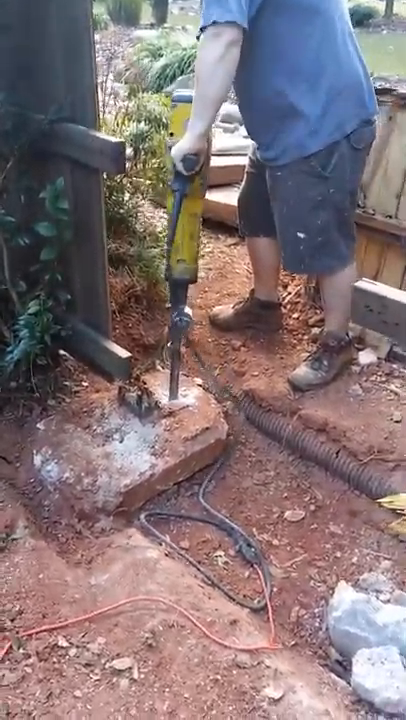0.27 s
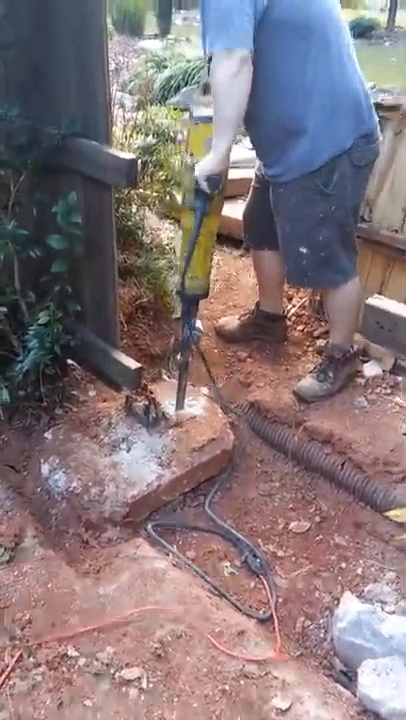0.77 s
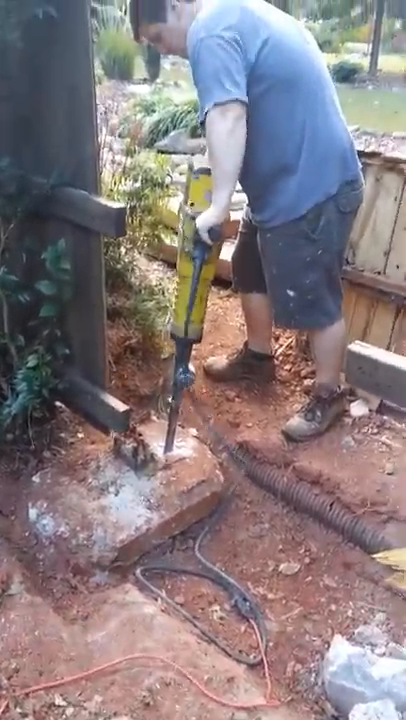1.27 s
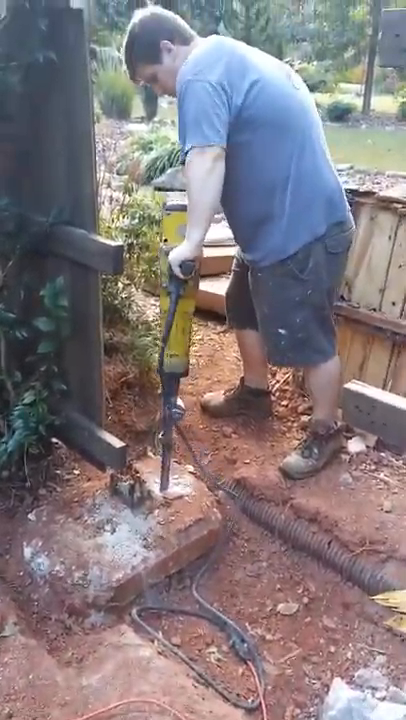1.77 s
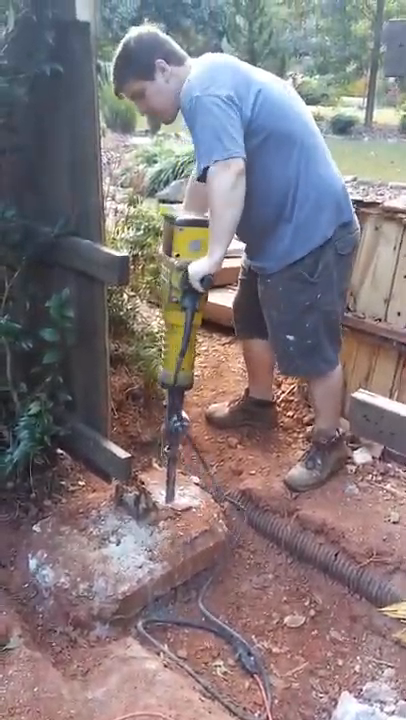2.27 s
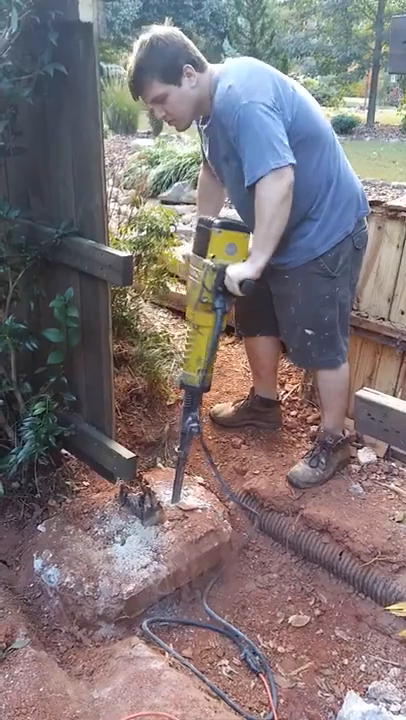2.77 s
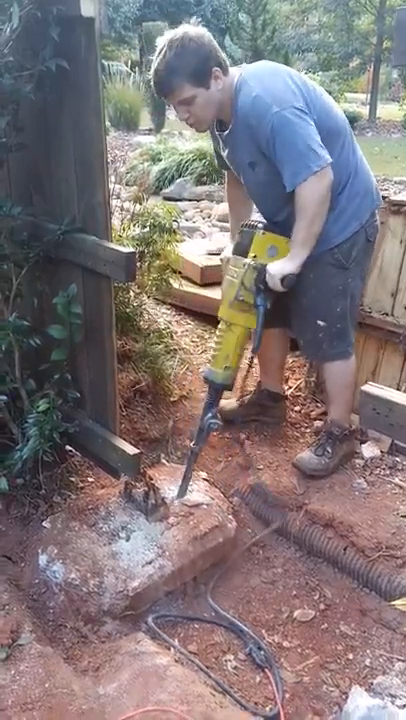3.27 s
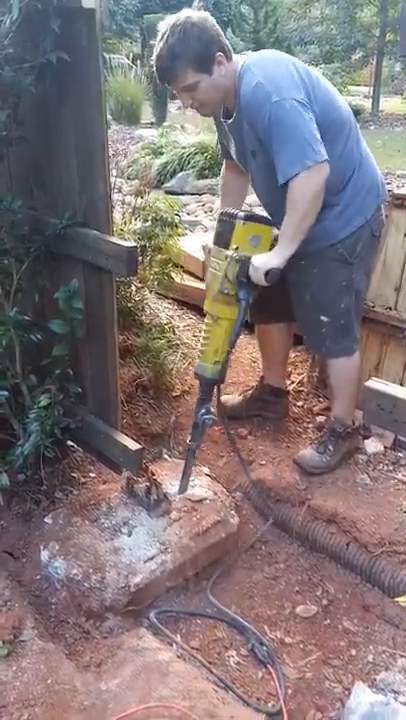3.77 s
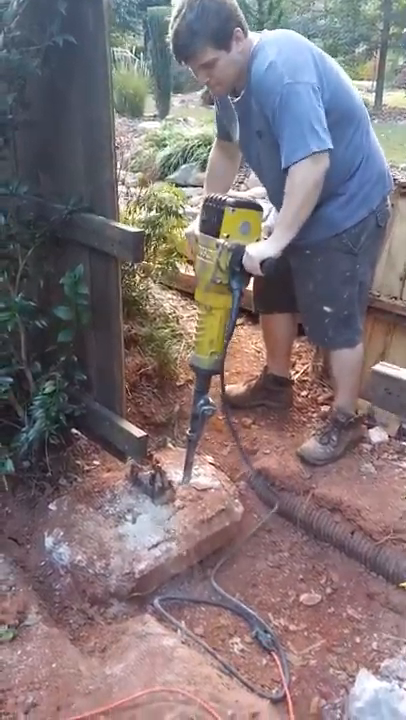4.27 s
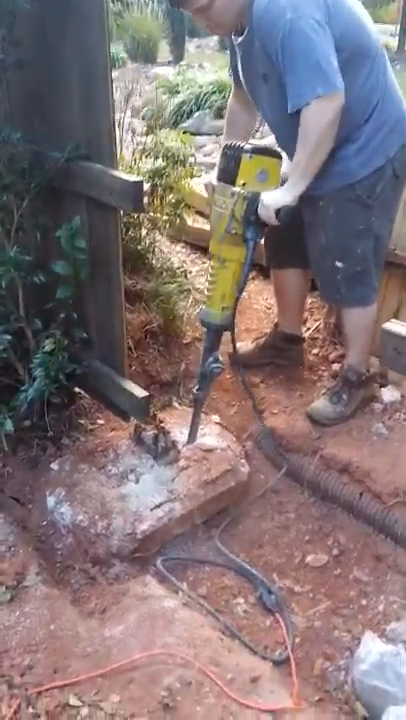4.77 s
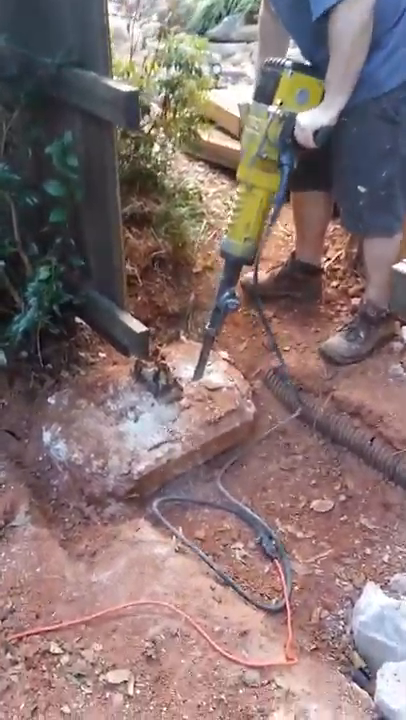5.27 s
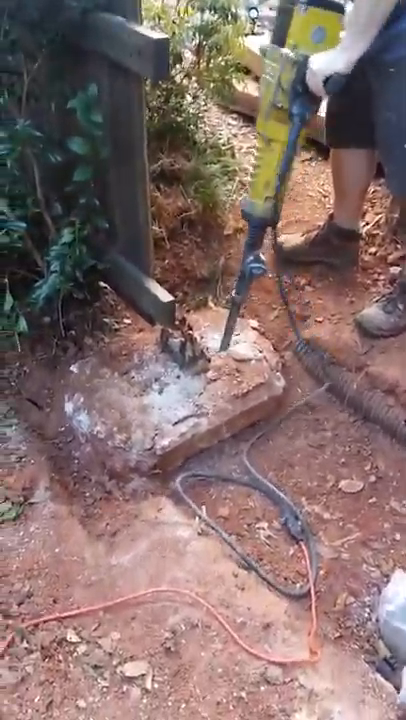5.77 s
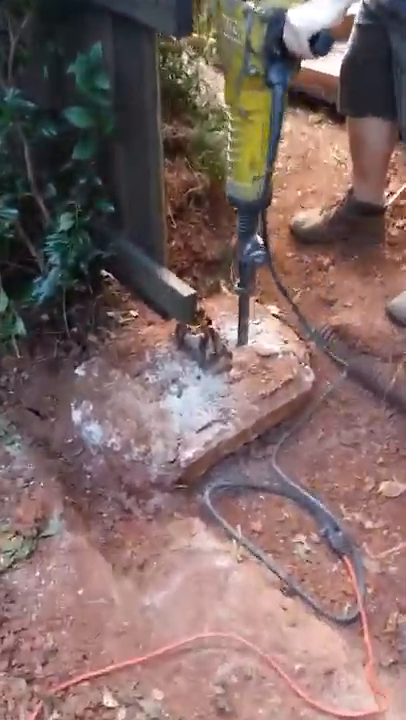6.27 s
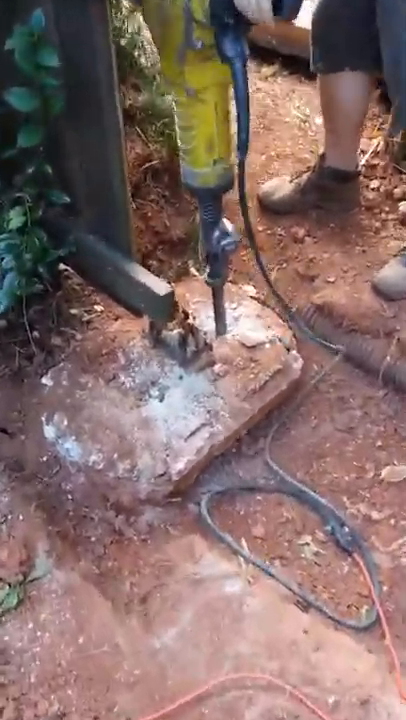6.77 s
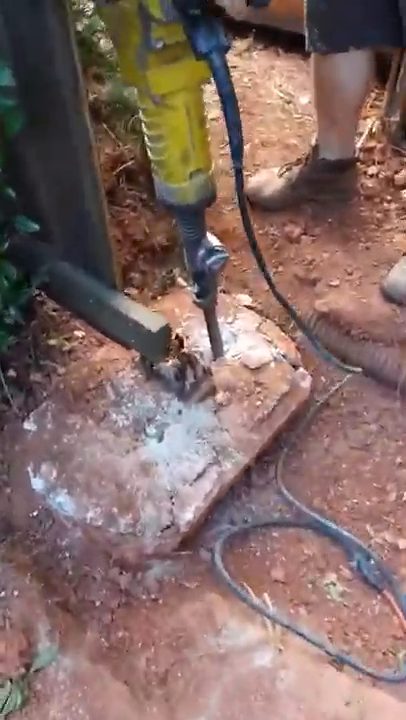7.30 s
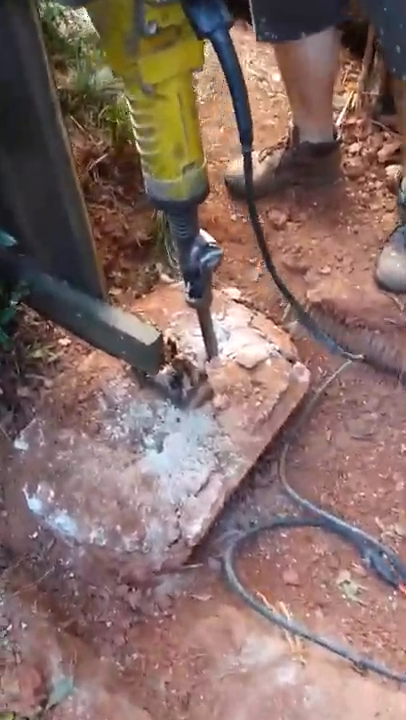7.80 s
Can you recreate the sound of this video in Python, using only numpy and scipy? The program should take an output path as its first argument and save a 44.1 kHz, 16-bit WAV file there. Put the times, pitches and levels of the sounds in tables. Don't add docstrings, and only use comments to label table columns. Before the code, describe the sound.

A dense, squashed, loud stream of steel-on-concrete impacts runs almost the whole time, each blow a sharp crack with a short clangy ring and crackling distortion. A motor roars and whines underneath. At the end the tool coasts: a few widening knocks, chattering gear grind that drops out and returns, tiny clicks, then faint open yard air. Close, dry, mono sound.

```python
import sys
import numpy as np
from scipy import signal
from scipy.fft import rfft, irfft
from scipy.io import wavfile
from scipy.ndimage import uniform_filter1d, minimum_filter1d

SR = 44100
rng = np.random.default_rng(int(sys.argv[2]) if len(sys.argv) > 2 else 0)


def generate_wav(signal):
    frames = np.transpose(np.atleast_2d(signal))
    scaled = np.clip(frames, -1, 1) * 32767
    pcm = np.round(scaled).astype(np.int16)
    wavfile.write(sys.argv[1], SR, pcm)


def boost_factor(decibels):
    exponent = np.asarray(decibels, float) / 20
    return 10 ** exponent


N = 354519


def curve(rows, column=1):
    rows = np.array(rows)
    return np.interp(np.arange(N) / SR, rows[:, 0], rows[:, column])


def colour(x, points):
    f, db = np.transpose(points)
    hz = np.fft.rfftfreq(len(x), 1 / SR)
    gain = boost_factor(np.interp(np.log(hz + 1), np.log(f), db))
    y = irfft(rfft(x) * gain, len(x))
    return y / y.std()


def wobble(width_hz):
    rate_hz = 400
    count = int(N / SR * rate_hz) + 2
    z = rng.standard_normal((count, 2)) @ [1, 1j]
    z = signal.lfilter([1], [1, -np.exp(-np.pi * width_hz / rate_hz)], z)
    return np.interp(np.arange(N) * rate_hz / SR, np.arange(count), z / z.std())


# (time [s], blow number [count])
PACE = [(0.0399, 0), (0.4245, 5), (0.739, 9), (1.5922, 20), (2.308, 29), (2.787, 35), (3.1085, 39),
        (3.3424, 42), (3.958, 50), (4.1912, 53), (4.5083, 57), (5.4495, 69), (5.7565, 73), (6.2895, 80),
        (6.6838, 85), (6.9168, 88)]
SLOWING_S = [7.0061, 7.1158, 7.2526, 7.4472, 7.746]


def strikes():
    s, number = np.transpose(PACE)
    powered = np.interp(np.arange(number[-1] + 1), number, s)
    return np.concatenate([powered, SLOWING_S])


def cycle():
    s = strikes()
    s = np.concatenate([[2 * s[0] - s[1]], s, [s[-1] + 0.35]])
    t = np.arange(N) / SR
    k = np.searchsorted(s, t, "right") - 1
    return np.maximum(k - 1, 0), t - s[k], np.diff(s)[k]


# (time [s], strength [dB], damping [factor])
STRENGTH = [
    (0, -4, 0.84),
    (6.9, 2.5, 1.3),
    (7.0065, -1, 0.82),
    (7.116, 0.5, 0.98),
    (7.252, -4.5, 1.2),
    (7.447, -9.5, 1.54),
    (7.745, -12.5, 4.22),
]


def force():
    now = np.arange(N)
    start = now - np.round(cycle()[1] * SR).astype(int).clip(0, now)
    return boost_factor(curve(STRENGTH))[start], curve(STRENGTH, column=2)[start]


# (frequency [Hz], level [dB])
CRACK = [(60, -37), (150, -7.5), (400, -7.5), (2000, -6.5), (5000, 2.5), (9000, -10), (11500, -6),
         (13200, -12), (14500, 1), (16000, -27)]
# (frequency [Hz], level [dB])
RINGING = [(3000, -33), (5500, -14), (11500, -1), (13200, 9), (15800, -14)]
# (frequency [Hz], level [dB])
HOUSING = [(5500, -24.5), (6800, -9.5), (7600, -3), (8100, 0.5), (8800, -4), (9600, -4.5), (10500, -3.5),
           (11300, -13.5), (14000, -19)]


def blow():
    age = cycle()[1]
    strength, damping = force()
    crack = boost_factor(-2.5 - 60 * age / 0.057) + boost_factor(-15.5 - 60 * age * damping / 0.36)
    ringing = boost_factor(-15.5 - 60 * age * damping / 0.28)
    rattle_db = 8.0 * wobble(width_hz=50).real
    housing = boost_factor(-3.0 + rattle_db - 60 * age * damping / 0.36) + boost_factor(-4 - 60 * age / 0.047)
    noise = rng.standard_normal((3, N))
    parts = crack * colour(noise[0], CRACK)
    parts += ringing * colour(noise[1], RINGING)
    parts += housing * colour(noise[2], HOUSING)
    return strength * parts


# (time [s], extra overload [dB], extra tip ring [dB])
ODD = [(0.118, 2.5, -11), (1.049, 4.5, -1), (1.204, 6, 4), (1.283, 2.5, .1), (1.437, -5.5, -3),
       (1.672, 3, 11), (1.83, 0, -5), (2.468, 1.5, -15), (2.948, 1, -1), (3.187, .1, 16), (4.036, 4.5, 4),
       (4.113, 3.5, 6), (4.35, 1, 5.5), (4.429, -8, -1), (4.509, -7, -2), (4.585, -2.5, 10), (4.977, 4, 7),
       (5.057, 1, 9), (5.214, 2.5, 5.5), (5.293, 3.5, -1.5), (5.757, 2, 10.5), (6.29, 2, -6),
       (6.447, 4.5, 0), (6.684, 0, -6), (6.917, 1.5, -2), (7.006, 5, 2.5), (7.116, 1.5, 0),
       (7.253, -26, -10), (7.447, -27, -7), (7.747, -10, .1)]


def odd_db(column):
    s, rows = strikes(), np.array(ODD)
    extra = np.zeros(len(s))
    nearest = abs(s[:, None] - rows[:, 0]).argmin(axis=0)
    extra[nearest] = rows[:, column]
    return extra


# (time [s], shank freedom [dB], tip freedom [dB])
GRIP = [(0.04, -14.5, -7), (0.4, -21, -21), (0.75, -11.5, -14.5), (1.1, -22, -9), (1.4, -12, -28),
        (1.7, -22.5, -17), (2.3, -22.5, -15), (2.8, -19, -15), (3.1, -15.5, -11), (3.351, -35, -9.5),
        (3.8, -25.5, -12.5), (4.4, -16, -17), (4.75, -19, -11), (5.0, -27.5, -13), (5.7, -25, -6.5),
        (6.002, -14.5, -11), (6.6, -23, -15), (6.95, -22, -8)]
# (share of shank freedom [ratio], share of tip freedom [ratio], offset [dB], scatter by blow [dB])
RING_LAW = [(0.83, 0.11, 1.1, 2.5), (0.15, 1, 1.9, 4.5), (0.049, 0.77, -11, 1.5), (0, 0.56, -20.5, 3.5)]


def ring_db():
    s, (at, shank, tip), law = strikes(), np.transpose(GRIP), np.transpose(RING_LAW)
    shank_db = np.interp(s, at, shank)
    tip_db = np.interp(s, at, tip) + odd_db(column=2)
    level = np.outer(shank_db, law[0]) + np.outer(tip_db, law[1]) + law[2]
    scatter_db = law[3] * rng.standard_normal(level.shape)
    fade_db = 57 * np.maximum(s - 7.05, 0)
    return level + scatter_db - fade_db[:, None]


BIT_HZ = [4838, 5375, 6965, 9390, 12035, 14870, 15275, 15600]
# (level in its group [dB], free t60 [s], landed t60 [s], mode group [RING_LAW row, counted from
BIT = [(3.3, 0.16, 0.071, 2), (3.2, 0.11, 0.14, 2), (16.6, 0.11, 0.12, 2), (10.1, 0.25, 0.092, 3),
       (11.7, 0.26, 0.13, 4), (5.8, 0.48, 0.1, 5), (6, 0.27, .15, 5), (4, 0.38, 0.12, 5)]


def bit():
    k, age, _ = cycle()
    rows, out = ring_db(), np.zeros(N)
    damping = force()[1]
    landing = .027 + .004 * rng.standard_normal(len(rows))[k]
    for hz, (db, free, landed, column) in zip(BIT_HZ, BIT):
        detune = 1 + 0.00214 * rng.standard_normal(len(rows))[k]
        free_part = np.minimum(age, landing) / free
        landed_part = np.maximum(age - landing, 0) / landed
        fall_db = 60 * damping * (free_part + landed_part)
        swing = (1 + 1.01 * wobble(width_hz=78)) * np.exp(2j * np.pi * hz * detune * age)
        onset = 1 - np.exp(-age / 0.0029)
        out += boost_factor(rows[k, int(round(column)) - 2] + db - fall_db) * swing.imag * onset
    return out


STEEL_HZ = [2225, 4015, 4838, 7465, 8100, 8665, 9275, 10145, 10557, 11336, 11861, 14376]
# (struck level [dB], t60 [s], coasting level [dB], width [Hz], gear-loaded level [dB])
STEEL = [(-37, 0.46, -11, 39, -25), (-27.5, 0.57, -13, 28, -40), (-17.5, 0.88, -16, 48, -20.5),
         (-15.5, 0.54, -28, 32, -42), (-7, 0.36, -16, 280, -37), (-7, 0.55, -19, 320, -16),
         (-12, 0.47, -30, 84, -16), (-13, 0.17, -26, 160, -42), (-13.5, 0.44, -35, 38, -44),
         (-43, 0.24, -40, 54, -45), (-22, 0.54, -40, 86, -43), (-34, .25, -56, 60, -55)]
# (frequency [Hz], level [dB], t60 [s])
KNOCK = [(4150, -20, .06), (4830, -13, 0.031), (5600, -7, 0.029), (7600, -14, 0.094), (215, -27, 0.098),
         (3000, -19, .03), (9300, -24, .2)]


def steel():
    k, age, stroke = cycle()
    strength, damping = force()
    shaking, out = grinding(), np.zeros(N)
    load = np.exp(-((age / stroke - .78) / 0.15) ** 2) * boost_factor(curve(WHINE))
    for hz, (db, t60, shaken_db, width_hz, loaded_db) in zip(STEEL_HZ, STEEL):
        luck = rng.standard_normal(len(strikes()))
        luck_db = 6.5 * uniform_filter1d(luck, size=4)[k]
        struck = strength * boost_factor(db + luck_db - 60 * age * damping / t60)
        level = struck + shaking * boost_factor(shaken_db) + load * boost_factor(loaded_db)
        out += level * (wobble(width_hz) * np.exp(2j * np.pi * hz * age)).real
    knock = sum(boost_factor(db - 60 * age / t60) * np.sin(2 * np.pi * hz * age) for hz, db, t60 in KNOCK)
    last = np.arange(N) > SLOWING_S[-1] * SR
    return out + last * knock


# (frequency [Hz], level [dB])
MOTOR = [(25, -32), (285, -13.5), (900, -18.5), (1500, -12.5), (2300, -9.5), (3700, -11), (6000, -12.5),
         (8400, -5), (16000, -34.5)]
# (multiple [ratio], level [dB])
MESH = [(1, -26), (2, -24), (3, -12), (4, -31), (5, -12)]
# (time [s], level [dB], extra level of the lowest gear tone [dB])
WHINE = [(0, 4, 2), (1, 0.5, 3), (2, 0, 0), (3, 1.5, 3.5), (3.6, -1, 7), (4.1, -2, 7.5), (4.6, 0, 8.5),
         (5.2, 1, 5), (5.8, -1.5, 6.5), (6.4, 3.1, 5), (6.92, 3, 7), (6.97, 3.5, .1), (7.05, 0, .1),
         (7.2, -31, 1)]
TEETH = 128.5


def motor():
    k, age, stroke = cycle()
    turn = age / stroke
    load = np.exp(-((turn - .84) / 0.098) ** 2) * (stroke < .085)
    flutter_db = 3 * wobble(width_hz=60).real
    roar = boost_factor(-18.0 + 0.43 * load + flutter_db) * colour(rng.standard_normal(N), MOTOR)
    mesh_hz = TEETH / stroke * (1 - .55 * np.clip(turn - .78, 0, 1))
    phase = 2 * np.pi * np.cumsum(mesh_hz) / SR
    grip_db = 1.5 * rng.standard_normal((len(strikes()), len(MESH)))[k]
    lowest_db = curve(WHINE, column=2)
    grip_db[:, 0] += lowest_db
    grip_db[:, 2] -= 0.38 * lowest_db
    teeth = np.zeros(N)
    for j, (multiple, db) in enumerate(MESH):
        tone = (1 + 0.27 * wobble(width_hz=200)) * np.exp(1j * round(multiple) * phase)
        teeth += boost_factor(db + grip_db[:, j]) * tone.real
    return (roar + teeth * load) * boost_factor(curve(WHINE))


# (time [s], level [dB])
COAST = [
    (7.0, -38),
    (7.08, -16.5),
    (7.2, -15),
    (7.4, -21.5),
    (7.55, -22.5),
    (7.61, -34),
    (7.85, -30),
    (7.93, -34.5),
    (8.04, -53),
]
# (time [s], depth [dB], half width [s])
STALLS = [
    (7.14, 9, 0.014),
    (7.245, 11, 0.014),
    (7.35, 13, 0.0094),
    (7.437, 15, 0.006),
    (7.595, 18, 0.0056),
    (7.718, 11, 0.01),
    (7.79, 13, 0.011),
]


def grinding():
    t = np.arange(N) / SR
    drop_db = sum(db * np.exp(-((t - s) / width) ** 2) for s, db, width in STALLS)
    return boost_factor(curve(COAST) - drop_db) * (t > COAST[0][0])


# (frequency [Hz], level [dB])
IDLE = [(25, -42), (200, -21), (1200, -11), (1900, -9), (2300, -1.5), (2800, -9), (3500, -8), (5000, -11.5),
        (6300, -20.5), (8300, -9), (11000, -27), (15800, -29)]


def coasting():
    contacts = (rng.random(N) < 2500 / SR) * rng.standard_normal(N)
    chatter = contacts * boost_factor(1.46 * rng.exponential(1, N))
    grind = colour(chatter / chatter.std() + 1.25 * rng.standard_normal(N), IDLE)
    clumps = boost_factor(2.0 * wobble(width_hz=38).real)
    return grinding() * clumps * grind


# (time [s], peak level [dB])
CLICKS = [
    (7.9094, -10),
    (7.9543, -24),
    (8.009, -11),
]


def clicks():
    out, t = np.zeros(N), np.arange(600) / SR
    tick = colour(rng.standard_normal(N), HOUSING)
    for s, db in CLICKS:
        part = out[round(s * SR):][:600]
        part += boost_factor(db - 16.5 - 60 * t[:len(part)] / 0.019)
    return out * tick


# (start time [s], frequency [Hz], level [dB], rise time [s])
SETTLE = (7.95, 208, -42, .07)


def settling():
    s, hz, db, rise = SETTLE
    t = np.arange(N) / SR - s
    turn = np.exp(2j * np.pi * hz * t)
    hum = (1 + .15 * wobble(width_hz=30)) * (turn + .3 * turn ** 2)
    return boost_factor(db) * np.clip(t / rise, 0, 1) * hum.real


# (frequency [Hz], level [dB])
YARD = [(25, -26), (200, 1), (1000, -1), (6000, -25), (8300, -25), (12000, -20), (15800, -28)]


def yard():
    return boost_factor(-46.0) * colour(rng.standard_normal(N), YARD)


def scene():
    mono = blow() + steel() + bit() + motor() + coasting() + clicks() + settling() + yard()
    return np.array([mono, mono])


# (frequency [Hz], level [dB])
POPS = [(30, -51), (100, -12.5), (250, 1), (600, 1), (1200, -1), (3000, -5), (8000, -19.5), (16000, -42)]
OVERLOAD_DB, OVERLOAD_SCATTER_DB = -20.5, 0.5


def crackle():
    k, age, _ = cycle()
    chance = 900 / SR / (1 + np.exp((age - .014) / 0.003)) + 250 / SR
    pops = rng.random(N) < chance
    side = np.where(rng.random(N) < .25, -1, 1)
    size = pops * side * boost_factor(2.04 * np.minimum(rng.exponential(1, N), 4))
    scatter_db = OVERLOAD_SCATTER_DB * rng.standard_normal(len(strikes()))
    blow_db = OVERLOAD_DB + odd_db(column=1) + scatter_db
    level = boost_factor(blow_db[k] - 6.) * (0.19 + 1 / (1 + np.exp((age - .016) / 0.0013)))
    return colour(size * level, POPS) * boost_factor(-24.0)


def top_cut(x):
    return signal.sosfilt(signal.butter(12, 16890, fs=SR, output="sos"), x)


def record(dry):
    capsule = 2.15 * np.tanh(dry / 3.0)
    peak_db = -minimum_filter1d(-20 * np.log10(abs(capsule[0]) + 1e-9), size=90, origin=-44)
    slide = np.arange(N) * 2500.0 / SR
    ahead_db = np.maximum.accumulate((peak_db - slide)[::-1])[::-1] + slide
    fall = np.arange(N) * 1200.0 / SR
    held_db = np.maximum.accumulate(ahead_db + fall) - fall
    over_db = np.maximum(held_db + 3, 0)
    limited = 1.47 * capsule / boost_factor(uniform_filter1d(over_db, size=30)) + crackle()
    rumble_cut = signal.butter(2, 40, "high", fs=SR, output="sos")
    rounded = signal.sosfilt(rumble_cut, 0.83 * np.tanh(limited / 0.83))
    edge = signal.firwin(1201, 15790, window=("kaiser", 9), fs=SR)
    mix = signal.oaconvolve(rounded, edge[None], "same")
    return top_cut(mix)


dry = scene()
out = record(dry)
generate_wav(out)
```